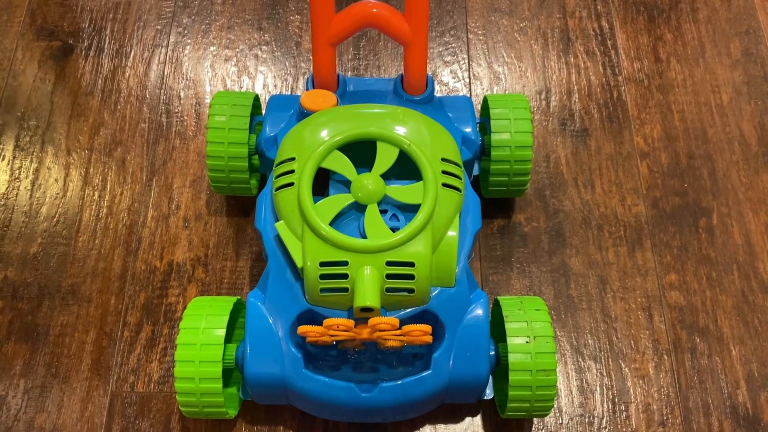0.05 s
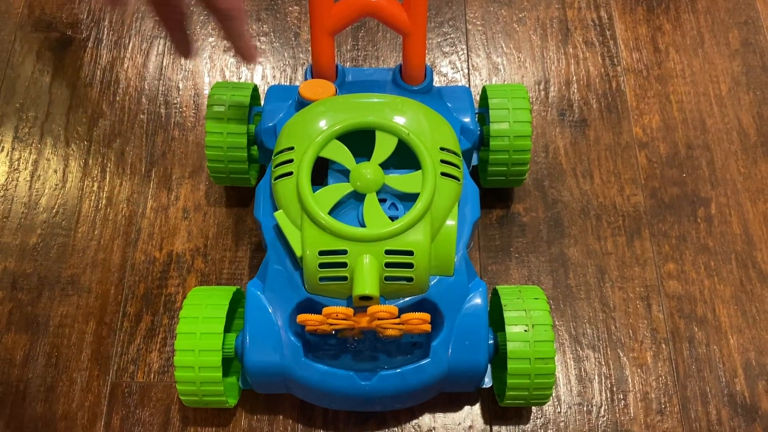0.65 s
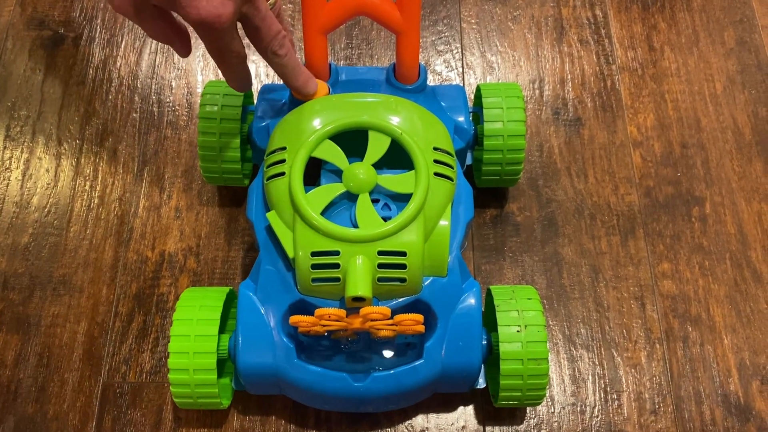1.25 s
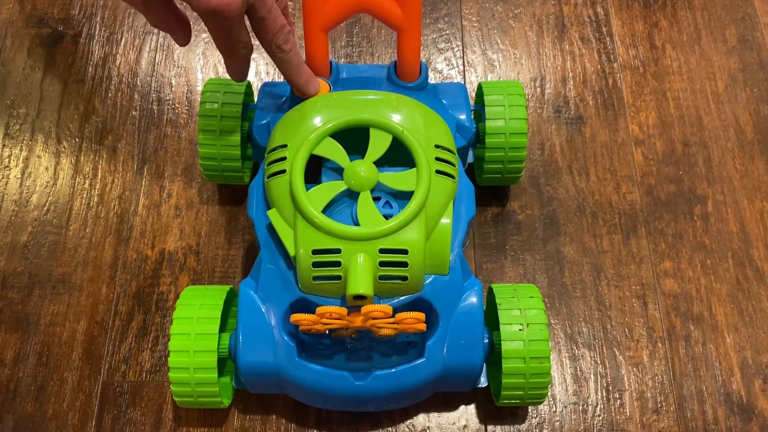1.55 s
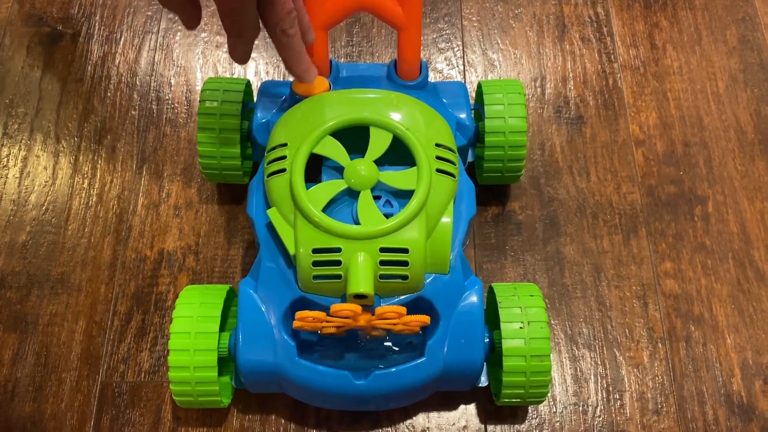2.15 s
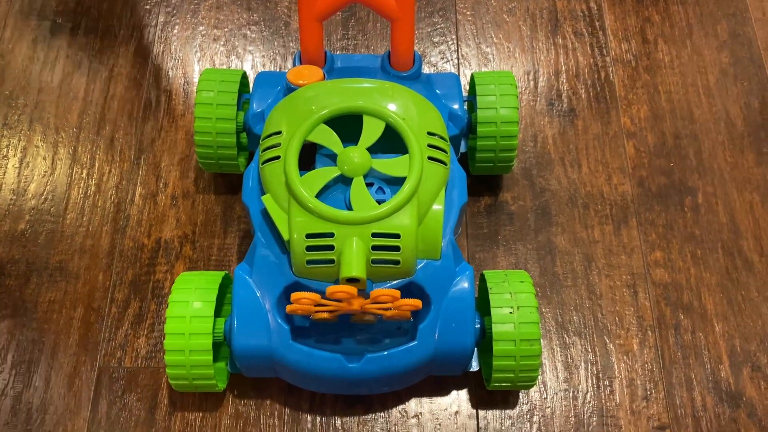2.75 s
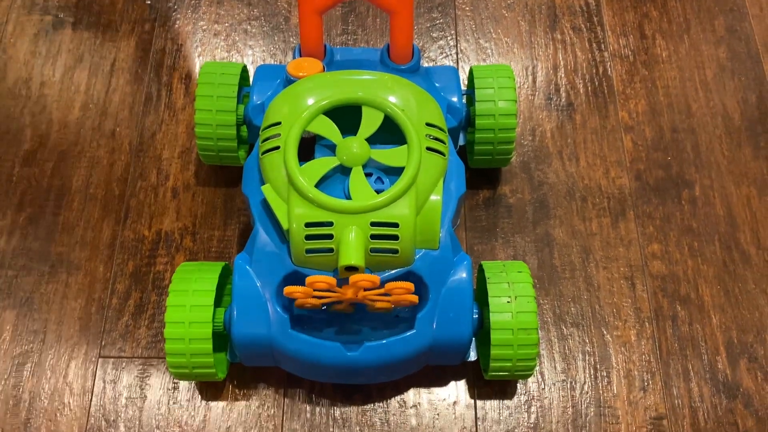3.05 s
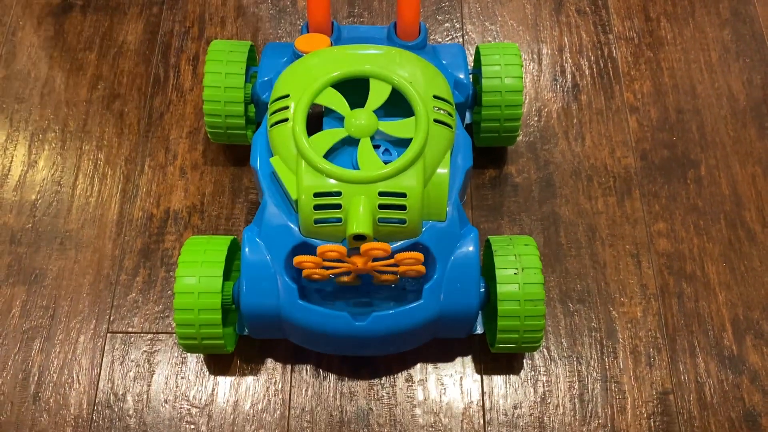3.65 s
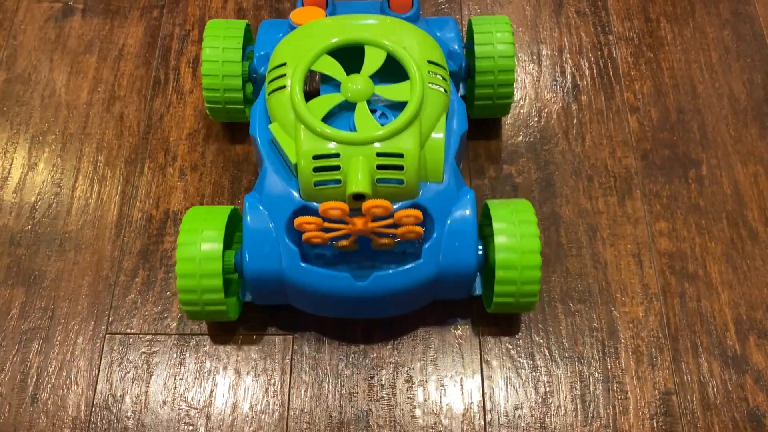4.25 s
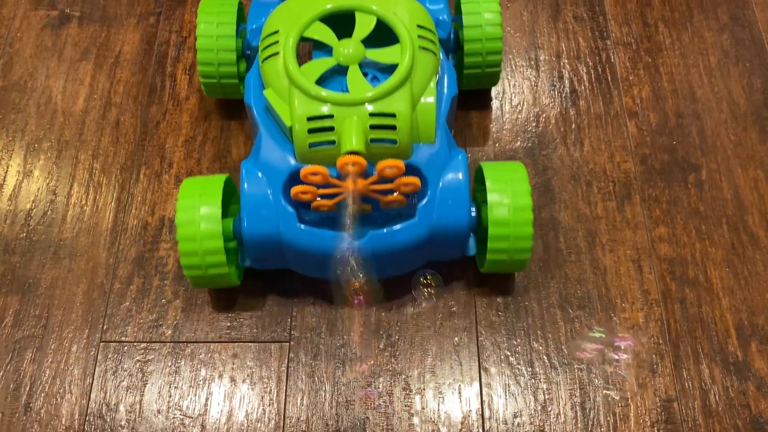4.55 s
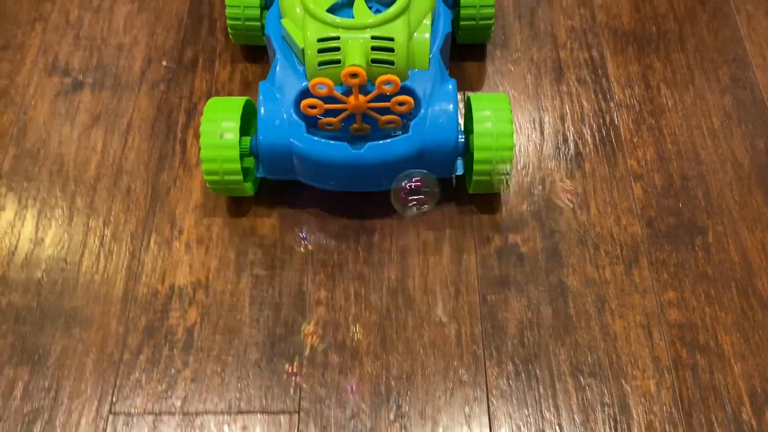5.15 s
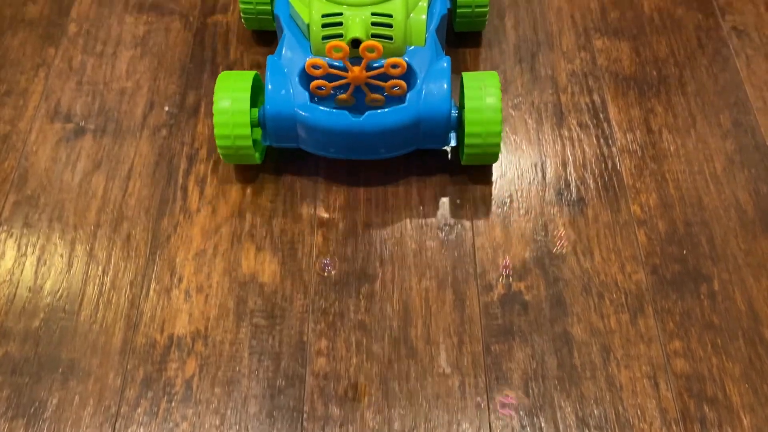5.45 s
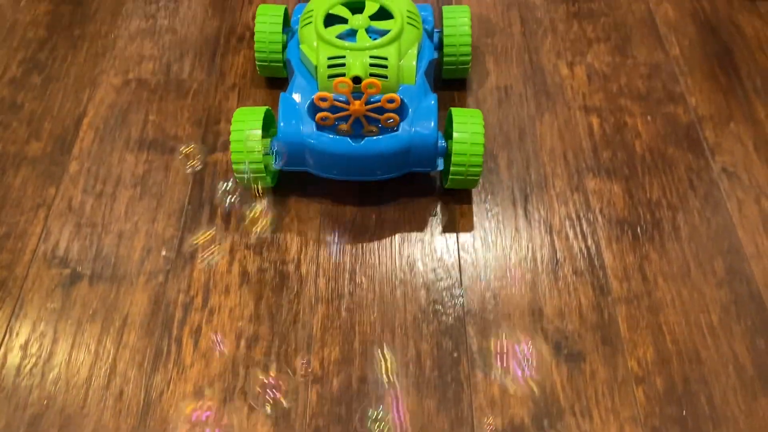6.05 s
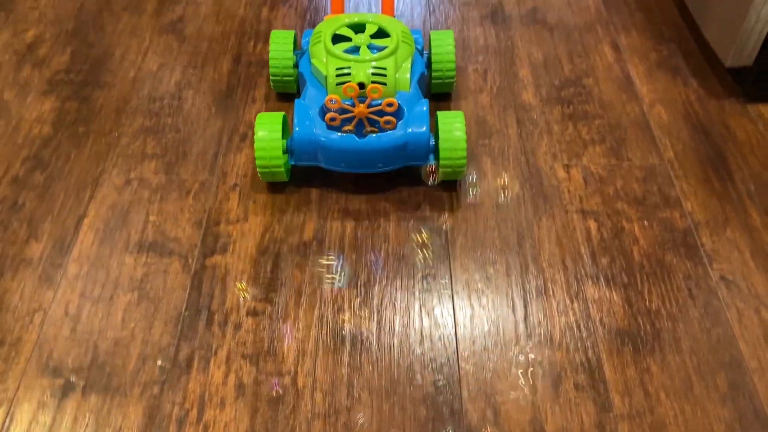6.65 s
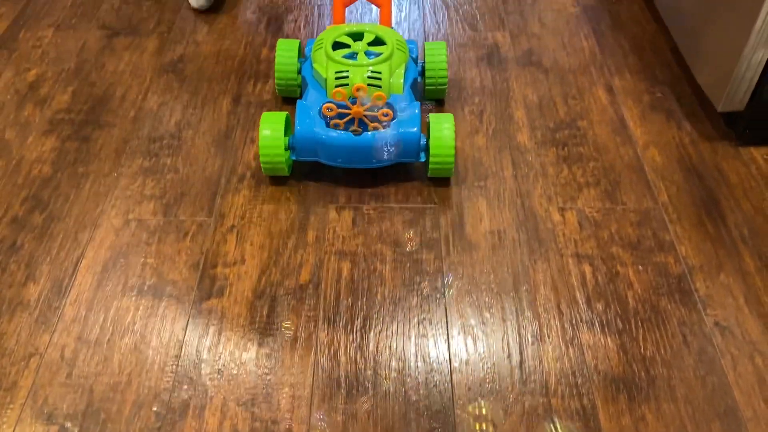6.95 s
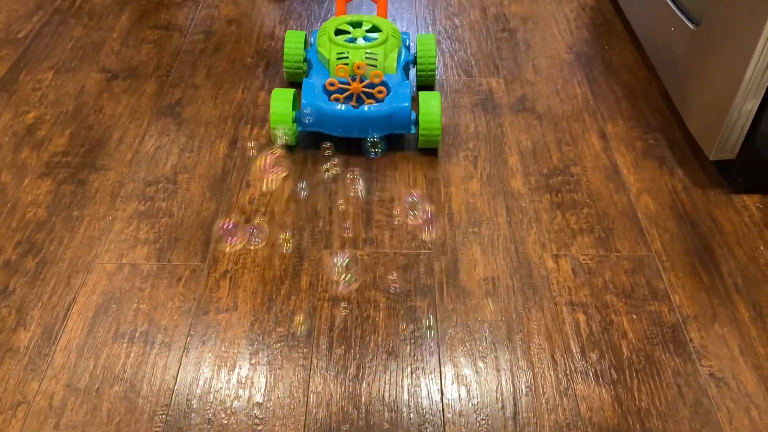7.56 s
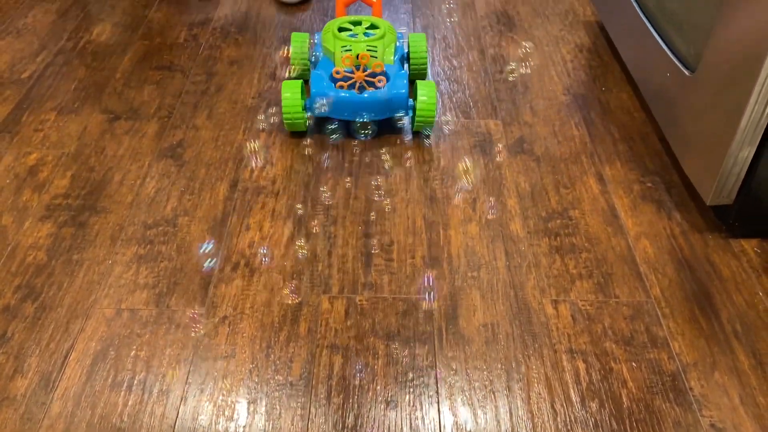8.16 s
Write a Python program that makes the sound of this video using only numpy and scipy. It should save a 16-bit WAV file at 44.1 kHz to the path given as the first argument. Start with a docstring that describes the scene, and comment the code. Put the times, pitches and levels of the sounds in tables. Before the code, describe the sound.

After a button click, a battery toy's fan spins up to an airy whine, joined by hollow knocks and ratcheting snaps as it rolls.

```python
"""A toy bubble mower on a wooden floor indoors. A rustle dies away over room rumble and a faint hum.
A button clicks down, the fan motor spins up to a whine over gear chatter and rushing air, and the
button clicks back. The toy is pulled away: its hollow wheels bump on the boards and the whine's
partials swell and fade in the room's standing waves. The axles chirp, then the plastic snaps five
times, like a ratchet, and the toy rolls on."""
import sys
import numpy as np
from scipy import signal
from scipy.fft import rfft, irfft
from scipy.io import wavfile

SR = 44100
rng = np.random.default_rng(int(sys.argv[2]) if len(sys.argv) > 2 else 0)


def bounce(signal):
    """Save signal as a 16-bit WAV file at the path given by the first command-line argument."""
    frames = np.transpose(np.atleast_2d(signal))
    limited = np.clip(frames, -1, 1)
    pcm = np.round(limited * 32767).astype(np.int16)
    wavfile.write(sys.argv[1], SR, pcm)


N = 365588
TIME = np.arange(N) / SR
FREQS = np.fft.rfftfreq(N, 1 / SR)
SWITCH_ON_S, TOP_TURNS_PER_S = 1.572, 175.05

# time_s, level_db
AIR_CURVE = [(2.2, 0), (2.7, 0.5), (7.0, 1), (7.8, -2), (8.29, -4)]

def motor():
    """Whine, fan air and ringing housing, all timed by one slightly unsteady shaft."""
    speed, far = shaft_speed(), distance()
    slow = 1 - speed / TOP_TURNS_PER_S
    wander = .0009 * far ** 2 * drift(14)
    flutter = .0006 * drift(90)
    shudder = .03 * slow * drift(90)
    angle = 2 * np.pi * np.cumsum(speed * (1 + wander + flutter + shudder)) / SR
    air_db = in_time(AIR_CURVE) - 12 * slow
    # gears rasp harder once the toy rolls
    gears_db = air_db + 5.5 * np.minimum(far, 1) ** 2 + (1 + 1.5 * far) * drift(45)
    powered = np.clip((TIME - SWITCH_ON_S) / .0067, 0, 1)
    return powered * (fan(angle, air_db) + housing(angle, slow, gears_db) + whine(angle, speed))


def shaft_speed(spin_up_s=.114, creep_s=.31, creep_share=.108, sag_turns_per_s2=.575):
    """Turns per second: quick spin-up, slow creep, steady sag as the battery is loaded."""
    age = np.maximum(TIME - SWITCH_ON_S, 0)
    lacking = (1 - creep_share) * np.exp(-age / spin_up_s) + creep_share * np.exp(-age / creep_s)
    return TOP_TURNS_PER_S * (1 - lacking) - sag_turns_per_s2 * age


def whine(angle, speed, fades_per_s=4.5):
    """Shaft harmonics, each beating against room echoes that grow with distance."""
    running, far = np.median(speed), distance()
    slow = np.clip(1 - speed / running, 1e-4, .999)
    flutters_db = [(1.51 + 8 * np.minimum(slow, .3)) * drift(30) for _ in range(7)]
    echoes = [far ** 2 / np.sqrt(2) * (drift(fades_per_s) + 1j * drift(fades_per_s)) for _ in range(17)]
    out, partial, turn = np.zeros((2, N)), np.ones(N, complex), np.exp(1j * angle)
    for k in range(1, 92):
        partial = partial * turn
        level_db = partial_db(k, running, slow, far)
        level_db = spin_up_db(level_db, k, speed, slow) + flutters_db[k % len(flutters_db)]
        echo_gain = from_db(1 if k > 15 and k not in UNEVEN_PARTIALS else -7.5)
        echo_phase, own_phase = np.exp(2j * np.pi * rng.random(2))
        paths = 1 + echo_gain * echo_phase * echoes[k % len(echoes)]
        paths /= np.sqrt(1 + (echo_gain * far ** 2) ** 2)
        out += lean(k * running) * (from_db(level_db) * (partial * own_phase * paths).real)
    return np.sqrt(2) * out


# harmonic: time_s, level_db
UNEVEN_PARTIALS = { 4: [(1.6, -60), (1.95, -50), (2.5, -48.5), (3.6, -47.5), (4.4, -53), (4.9, -60),
                   (5.4, -63), (5.7, -58.5), (6.3, -59), (6.8, -51), (7.6, -73)], 6: [(2.5, -49.5),
                   (3.2, -48.5), (4.1, -48), (4.5, -53), (4.9, -49.5), (5.35, -57), (5.6, -55),
                   (6.05, -55.5), (6.65, -50.5), (7.1, -61), (7.3, -55), (7.68, -66), (7.9, -57),
                   (8.29, -62)], 9: [(1.7, -60), (1.76, -62), (1.96, -50), (2.25, -67), (2.48, -52),
                   (2.85, -56), (3.2, -51.5), (3.9, -60), (4.55, -58.5), (5.12, -51.5), (5.75, -63),
                   (6.0, -56), (6.4, -72), (6.8, -63), (7.25, -59), (7.53, -48.5), (7.8, -65)],
                   36: [(1.7, -85), (2.2, -75), (2.4, -58.5), (3.4, -61.5), (4.2, -58), (5.75, -67),
                   (5.95, -65), (7.9, -71), (8.15, -62)]}
# harmonic, near_db, far_db, swing_db, crest_s, period_s
SWELLING_PARTIALS = [(12, -56, -65, 8.5, 6.93, 3.37), (15, -60.5, -60, 6.5, 6.96, 3.78)]
# harmonic, near_db, far_db
PLAIN_PARTIALS = [(3, -44.5, -62), (5, -49.5, -60.5), (8, -49.5, -68.5), (10, -70, -62.5), (27, -56, -75),
                  (30, -67, -71.5), (33, -54, -73), (42, -62, -71.5), (51, -66, -74), (66, -66.5, -69.5),
                  (69, -65, -74.5)]
# freq_hz, level_db
BRUSH_BUZZ = [(170, -80), (350, -95), (2500, -89), (3500, -69), (4300, -77), (6500, -67), (9000, -76.5),
              (11500, -75.5), (13000, -75.5), (16000, -90)]

def partial_db(k, running, slow, far):
    """Base level of harmonic k; unlisted ones are brush buzz from the three-pole rotor."""
    if k in UNEVEN_PARTIALS:
        return in_time(UNEVEN_PARTIALS[k])
    for table, standstill_db in ((SWELLING_PARTIALS, -22), (PLAIN_PARTIALS, -62)):
        for harmonic, *field in table:
            if round(harmonic) == k:
                return receding_db(*field) + standstill_db * slow
    pole_db = 7 * (k % 3 == 0)
    worn_brush_db = 1.5 * (k > 44) * rng.standard_normal()
    return at_hz(BRUSH_BUZZ, k * running) - 1.5 + pole_db + worn_brush_db - 2.5 * far - 48 * slow


# freq_hz, width_hz, boost_db
SWEPT_RESONANCES = [(1026, 65, 13), (2275, 84, 12.5)]

def spin_up_db(level_db, k, speed, slow, build_up_s=.99, critical_turns_per_s=160.1):
    """Level with start-up effects: build-up, critical-speed flare, inrush buzz, housing resonances."""
    if k < 9:
        level_db = level_db - 13 * np.clip(1 - (TIME - SWITCH_ON_S) / build_up_s, 0, 1)
    if k == 6:
        level_db = level_db + 12.5 * bell(speed, critical_turns_per_s, width=7.2)
    if k in (12, 15, 18, 21):
        inrush_db = -62 + 20 * np.log10(4 * slow * (1 - slow)) - .5 * (k - 12)
        level_db = np.maximum(level_db, inrush_db)
    if k in (9, 12, 15, 18, 21):
        level_db = level_db + sum(db * bell(k * speed, hz, width) for hz, width, db in SWEPT_RESONANCES)
    return level_db


# freq_hz, density_db_per_hz
AIR_SPECTRUM = [(60, -110), (200, -104), (320, -94), (450, -84.5), (620, -81), (950, -79.5), (1200, -89),
                (1500, -82), (2400, -87.5), (3100, -86.5), (3900, -86.5), (4400, -94), (5300, -93),
                (6200, -102), (15500, -106)]
# freq_hz, likeness
STEREO_LIKENESS = [(200, 1), (2700, 0.04), (6500, 1)]

def fan(angle, level_db):
    """Rushing air and gear hiss, pulsing lightly with the shaft."""
    air = noise(from_db(at_hz(AIR_SPECTRUM, FREQS)) * lean(FREQS), alike=at_hz(STEREO_LIKENESS, FREQS))
    return from_db(level_db) * air * chatter(angle, per_turn=.039, per_pole=.09, uneven_db=1.2)


# freq_hz, width_hz, density_db_per_hz
HOUSING_MODES = [(1949, 194, -74.5), (3570, 195, -86.5)]

def housing(angle, slow, gears_db):
    """The gears shake the hollow housing: a low rattle and a high rasp."""
    low_ring, high_ring = [noise(from_db(db) * peak(hz, width), alike=1)
                           for hz, width, db in HOUSING_MODES]
    rattle_db = receding_db(near_db=3, far_db=-3, swing_db=2.5, crest_s=7, period_s=3.5)
    rattle = from_db(rattle_db) * low_ring * chatter(angle, per_turn=.45, per_pole=.15, uneven_db=2)
    rasp = from_db(gears_db) * high_ring * np.exp(np.cos(angle) / np.pi)
    return from_db(-9 * slow) * (rattle + rasp)


def chatter(angle, per_turn, per_pole, uneven_db):
    """Envelope of contact noise: uneven spurts at each turn and each commutator gap."""
    spurts = np.exp(per_turn * np.cos(angle) + per_pole * np.cos(3 * angle))
    spurts *= from_db(uneven_db * drift(110))
    return spurts / np.sqrt(np.mean(spurts ** 2))


# time_s, far_share
PATH = [(4.2, 0.57), (5.2, 0.75), (6.4, 0.87), (7.4, 1.04), (8.29, 1.08)]
PATH_START_S = PATH[0][0]

def distance():
    """Position of the toy, 0 near and 1 far; held at its first value before 4.2 s."""
    return in_time(PATH)


def receding_db(near_db, far_db, swing_db=0, crest_s=0, period_s=1):
    """Level of a tone as the toy recedes through standing waves."""
    far = distance()
    standing_wave = np.cos(2 * np.pi * (np.maximum(TIME, PATH_START_S) - crest_s) / period_s)
    return near_db * (1 - far) + far_db * far + swing_db * standing_wave


# freq_hz, right_over_left_db
MOTOR_BALANCE = [(250, -1), (700, 3.5), (1400, 5), (2000, 1), (5000, 1.5)]

def lean(hz):
    """Left and right gains of the motor."""
    return from_db(np.array([[-.5], [.5]]) * at_hz(MOTOR_BALANCE, hz))


# time_s, level_db
ROLL_CURVE = [(2.4, -48), (4.4, -16), (4.7, -3.5), (5.2, -1), (5.95, -5), (6.7, 2.5), (7.3, -7), (7.8, -9),
              (8.1, -1.5), (8.29, -10.5)]
# freq_hz, density_db_per_hz
ROLL_SPECTRUM = [(80, -104), (280, -102.5), (420, -76.5), (600, -75), (800, -90.5), (1300, -82.5),
                 (3000, -115)]

def wheels(lumpy_db=2.5):
    """Ribbed hollow wheels rumble over the boards."""
    level_db = in_time(ROLL_CURVE) + lumpy_db * drift(45)
    return from_db(level_db) * coloured(ROLL_SPECTRUM, alike=at_hz(STEREO_LIKENESS, FREQS))


def rib_knocks(per_s=10, ring_db=-4):
    """Bump rows for the small random knocks of the wheel ribs, following the rolling level."""
    slots_s = np.arange(PATH_START_S, TIME[-1] - 1 / per_s, 1 / per_s)
    late, strength, detune = rng.uniform(-1, 1, (len(slots_s), 3)).T
    start_s = slots_s + .5 * late / per_s
    level_db = np.interp(start_s, *np.transpose(ROLL_CURVE)) - 8 + 3 * strength
    pitch_hz = 480 + 90 * detune
    return [(s, db, ring_db, hz) for s, db, hz in zip(start_s, level_db, pitch_hz)]


# start_s, level_db, ring_over_thud_db, pitch_hz
LOUD_BUMPS = [(1.37, -3, 0, 236), (1.532, 2, 0, 350), (1.554, -1, 1, 496), (1.577, -1.5, 2, 514),
              (3.837, -.5, 0, 506), (4.619, 0, -1, 520), (4.709, 4.5, 2, 560), (5.04, 3.5, 3, 525),
              (5.159, -1, -4, 608), (5.18, 1.5, -2, 533), (5.221, -.5, -4, 480), (5.389, 0, 5, 612),
              (5.676, 7.5, -10, 790), (5.997, -1, 7, 622), (6.127, 6.5, -1.5, 622), (6.567, -1, 5, 606),
              (6.603, 2, -1, 400), (6.657, 1.5, 6, 612), (6.717, 3.5, 5, 605), (6.769, 2.5, 5.5, 604),
              (7.506, -3.5, 2, 533)]
# pitch_ratio, level_db, t60_share
SHELL_MODES = [(.68, -48, .5), (1, -37, 1.2), (1.07, -44, 1.2), (1.33, -45, .5)]
# freq_hz, density_db_per_hz
THUD_SPECTRUM = [(40, -108), (230, -102), (440, -75), (800, -75.5), (1200, -85), (2500, -107), (6000, -130)]

def bumps(knocks, damped_t60_s=.055, resonant_t60_s=.13, shell_hz=618):
    """Finger and wheels thud; the hollow shell rings, longest near its resonance, with little bass."""
    ring, thud, age = np.zeros(N + SR), np.zeros(N), TIME[:SR // 2]
    for s, db, ring_db, hz in LOUD_BUMPS + knocks:
        start = int(s * SR)
        t60_s = damped_t60_s + (resonant_t60_s - damped_t60_s) * bell(hz, shell_hz, width=25)
        thud += from_db(db) * burst(s, t60_s, rise_s=.0009, hold_s=.005)
        attack = 1 - np.exp(-age * hz)
        for ratio, mode_db, share in SHELL_MODES:
            decay = from_db(db + ring_db + mode_db - 60 * age / (share * t60_s))
            ring[start:start + len(age)] += attack * decay * np.sin(2 * np.pi * ratio * hz * age)
    bass_cut = signal.butter(5, 320, "high", fs=SR, output="sos")
    return signal.sosfilt(bass_cut, thud * coloured(THUD_SPECTRUM, alike=.83) + ring[:N])


# start_s, body_db, crack_db
RATCHET_SNAPS = [(6.7647, .5, -6), (6.814, 2.5, -6), (6.8999, 4, 0), (6.9752, 4.5, .5), (7.046, 4.5, 1.5)]
# freq_hz, density_db_per_hz
RATCHET_SPECTRUM = [(100, -100), (400, -74.5), (650, -69.5), (880, -58), (1200, -74), (1950, -63),
                    (2400, -73), (3200, -69), (4500, -102), (9000, -100)]

def ratchet(t60_s=.032):
    """The wheel ratchet snaps, harder each time."""
    return snaps([(*row, t60_s) for row in RATCHET_SNAPS], RATCHET_SPECTRUM, shiver_db=-16)


# start_s, body_db, crack_db, t60_s
BUTTON_CLICKS = [(1.277, -22, -62, 0.01), (1.367, -29, -30.5, .059), (1.474, -32, -43, .033),
                 (1.542, -29, -34, 0.25), (1.5925, -7.5, -4, 0.014), (2.11, -6, -4, .021),
                 (2.1275, 2, -34, 0.022)]
# freq_hz, density_db_per_hz
BUTTON_SPECTRUM = [(200, -95), (500, -69.5), (1000, -64.5), (1900, -62.5), (3300, -76), (4500, -109),
                   (9000, -100)]
# pitch_hz, level_db
SPRING_TONES = [(3330, -76), (4950, -74)]

def button():
    """The button slides down, clicks home and is let go; its spring rings as the finger lands."""
    tones = sum(from_db(db) * np.sin(2 * np.pi * hz * TIME) for hz, db in SPRING_TONES)
    spring = burst(start_s=1.368, t60_s=.42, rise_s=.002) * tones
    return snaps(BUTTON_CLICKS, BUTTON_SPECTRUM, shiver_db=-33) + spring


# freq_hz, density_db_per_hz
CRACK_SPECTRUM = [(1000, -131), (2500, -72.5), (3400, -65), (4400, -73), (5200, -64), (6500, -75.5),
                  (9000, -69), (12000, -74), (15500, -78)]

def snaps(rows, body_spectrum, shiver_db):
    """A snap rattles the shell: a hollow body and a bright crack; loose parts shiver on."""
    body, crack = np.zeros(N), np.zeros(N)
    for s, body_db, crack_db, t60_s in rows:
        shape = burst(s, t60_s, rise_s=.0008, hold_s=.0042)
        shape += from_db(shiver_db) * burst(s, t60_s=.16, rise_s=.0099)
        body += from_db(body_db) * shape
        crack += from_db(crack_db) * shape
    return body * coloured(body_spectrum, alike=.65) + crack * coloured(CRACK_SPECTRUM, alike=.9)


def ticks(knocks, relative_db=-14, spread_db=3):
    """Loose plastic ticks brightly with each knock."""
    shape = np.zeros(N)
    for s, db, *_ in knocks:
        shape += from_db(db + rng.normal(relative_db, spread_db)) * burst(s, t60_s=.014, rise_s=.0002)
    return shape * coloured(CRACK_SPECTRUM, alike=1)


# start_s, level_db
AXLE_CHIRPS = [(5.51, -3), (5.528, 1), (5.628, 2.5), (5.6857, 1), (6.12, 0), (6.311, -5)]
# freq_hz, width_hz, density_db_per_hz
AXLE_MODES = [(5130, 520, -81.5), (8570, 1040, -79.5)]

def axles():
    """Plastic rubs on the axles in brief bright chirps."""
    shape = sum(from_db(db) * burst(s, t60_s=.034, rise_s=.0014, hold_s=.0042) for s, db in AXLE_CHIRPS)
    resonances = sum(from_db(db) * peak(hz, width) for hz, width, db in AXLE_MODES)
    return shape * noise(resonances, alike=.85)


# crest_s, rub_db, hiss_db, swell_s, t60_s
RUSTLE_STROKES = [(.01, 10, -1, 0.03, 0.7), (.24, -10, 2, 0.077, 0.28), (.395, -14.5, -1, .028, 0.31),
                  (.69, -27, -9, 0.15, 0.77), (.92, -20.5, -10.5, 0.029, 0.28), (1.01, -33, -15, .02, 0.65)]
# freq_hz, density_db_per_hz
RUB_SPECTRUM = [(50, -85.5), (200, -86), (600, -89), (900, -87), (1450, -95), (2000, -84.5), (2700, -91.5),
                (3600, -90.5), (5500, -96), (12000, -115)]
# freq_hz, density_db_per_hz
HISS_SPECTRUM = [(1500, -120), (5500, -102), (10000, -103), (16000, -112)]

def rustle(grain_db=1):
    """Dying strokes of handling: a grainy rub with fine hiss."""
    rub, hiss = np.zeros(N), np.zeros(N)
    for s, rub_db, hiss_db, swell_s, t60_s in RUSTLE_STROKES:
        stroke = bell(np.minimum(TIME, s), s, swell_s) * from_db(-60 * np.maximum(TIME - s, 0) / t60_s)
        rub += from_db(rub_db) * stroke
        hiss += from_db(hiss_db) * stroke
    rub = rub * coloured(RUB_SPECTRUM, alike=np.maximum(at_hz(STEREO_LIKENESS, FREQS), .55))
    hiss = hiss * coloured(HISS_SPECTRUM, alike=.99)
    return (rub + hiss) * from_db(grain_db * drift(102))


# freq_hz, density_db_per_hz
RUMBLE_SPECTRUM = [(20, -102), (48, -85.5), (100, -89), (200, -90), (420, -91), (800, -99), (1300, -110),
                   (2500, -122), (15000, -130)]
# time_s, level_db
RUMBLE_CURVE = [(0, -3.5), (1.85, 3), (2.0, -8.5), (8.29, -8)]
# pitch_hz, level_db
HUM_TONES = [(193.8, -77), (387.6, -65), (775.2, -75)]

def room_tone(waver_db=.9):
    """Room rumble and a faint wavering hum that partly follows its level."""
    rumble_db, hum = in_time(RUMBLE_CURVE), np.zeros(N)
    for hz, db in HUM_TONES:
        level_db = db + .32 * rumble_db + waver_db * drift(9.1)
        hum += np.sqrt(2) * from_db(level_db) * np.sin(2 * np.pi * hz * TIME)
    return from_db(rumble_db) * coloured(RUMBLE_SPECTRUM, alike=.92) + hum


def room(x, t60_s, wet_db, wall_hz=9700, side=.32):
    """Diffuse reflections, partly different at each side, dulled by the walls."""
    age = TIME[:SR // 2]
    envelope = from_db(-60 * age / t60_s) * (1 - np.exp(-age / .002))
    common, apart = rng.standard_normal((2, len(age))) * envelope
    tail = common + side * apart * np.array([[1], [-1]])
    dull = np.exp(-2 * np.pi * wall_hz / SR)
    tail = signal.lfilter([1 - dull], [1, -dull], tail / np.sqrt(np.sum(tail ** 2) / 2))
    return x + from_db(wet_db) * signal.fftconvolve(x, tail, axes=1)[:, :N]


def from_db(db):
    """Decibels to gain."""
    return 10 ** (np.asarray(db) / 20)


def in_time(curve):
    """A curve at every sample."""
    return np.interp(TIME, *np.transpose(curve))


def at_hz(points, hz):
    """A spectrum read on a log-frequency axis."""
    freqs, values = np.transpose(points)
    return np.interp(np.log(np.maximum(hz, 1)), np.log(freqs), values)


def bell(x, centre, width):
    """Gaussian of height 1."""
    return np.exp(-((x - centre) / width) ** 2)


def peak(hz, width_hz):
    """Gain of a steep-sided resonance at every frequency."""
    return 1 / np.sqrt(1 + (2 * (FREQS - hz) / width_hz) ** 4)


def drift(per_s):
    """Smooth random curve of spread 1."""
    knots = rng.standard_normal(1024)
    return np.interp(TIME * per_s, np.arange(8192) / 8, signal.resample(knots, 8192))


def noise(gain, alike):
    """Stereo noise from a gain per root Hz and a left-right likeness, 0 to 1."""
    mid, side = rfft(rng.standard_normal((2, N)))
    alike = np.clip(alike, 0, 1)
    pair = np.sqrt(1 + alike) * mid + np.sqrt(1 - alike) * side * np.array([[1], [-1]])
    return irfft(pair * gain, N) * np.sqrt(SR) / 2


def coloured(spectrum, alike):
    """Stereo noise from a spectrum in dB per Hz."""
    return noise(from_db(at_hz(spectrum, FREQS)), alike)


def burst(start_s, t60_s, rise_s, hold_s=0):
    """Envelope of a blow: quick rise, held contact, exponential fall."""
    out, start = np.zeros(N), int(start_s * SR)
    age = TIME[:min(SR // 2, N - start)]
    fall = from_db(-60 * np.maximum(age - hold_s, 0) / t60_s)
    out[start:start + len(age)] = (1 - np.exp(-age / rise_s)) * fall
    return out


def scene():
    """The running toy and its knocks in the room."""
    plastic = button() + ratchet()
    knocks = rib_knocks()
    clicks = room(plastic + ticks(knocks) + axles(), t60_s=.4, wet_db=-4.5)
    thumps = room(bumps(knocks), t60_s=.3, wet_db=-9)
    return motor() + wheels() + clicks + thumps + rustle() + room_tone()


# freq_hz, right_lead_rad
PORT_LEAD = [(0, 0), (1100, 1), (2000, -.3), (3100, -1), (4000, -.5), (5200, -.3), (7000, -3),
             (7500, -3.25), (8300, -4.3), (10300, -6.3), (13700, -9.4), (16000, -12.2)]

def record(dry, low_hz=40, high_hz=16000):
    """Two microphone ports hear the sound out of phase; deep bass and top are cut."""
    lead_rad = np.interp(FREQS, *np.transpose(PORT_LEAD))
    ports = irfft(rfft(dry) * np.exp(1j * lead_rad * np.array([[-.5], [.5]])), N)
    ports = signal.sosfilt(signal.butter(4, low_hz, "high", fs=SR, output="sos"), ports)
    return signal.sosfilt(signal.ellip(10, .1, 80, high_hz, fs=SR, output="sos"), ports)


dry = scene()
out = record(dry)
bounce(out)
```